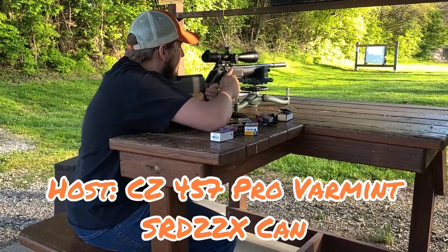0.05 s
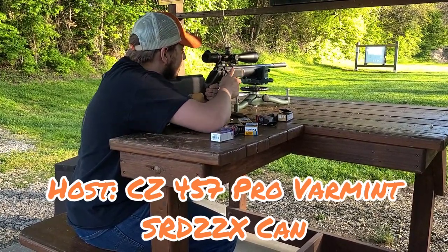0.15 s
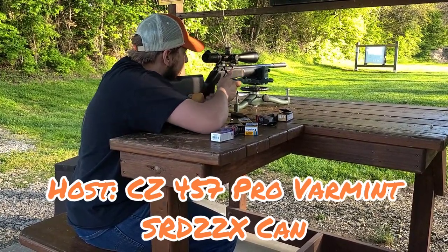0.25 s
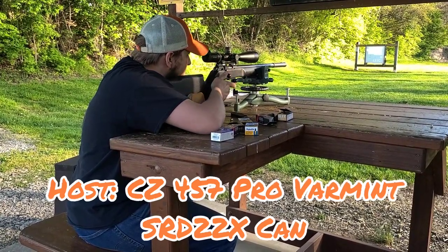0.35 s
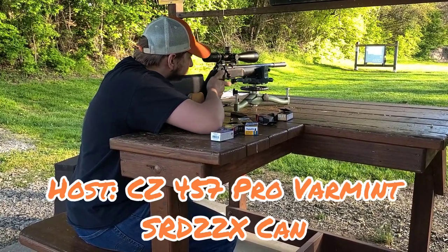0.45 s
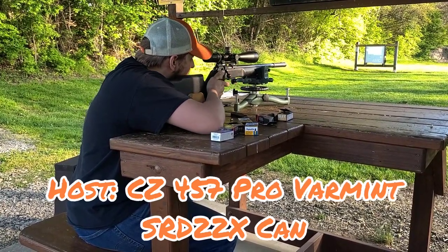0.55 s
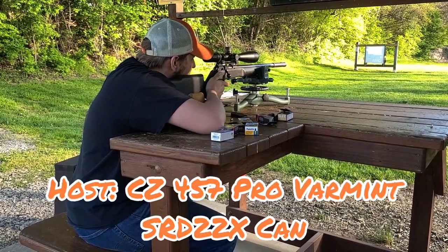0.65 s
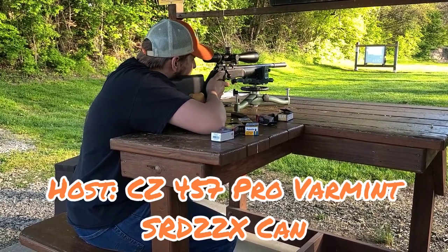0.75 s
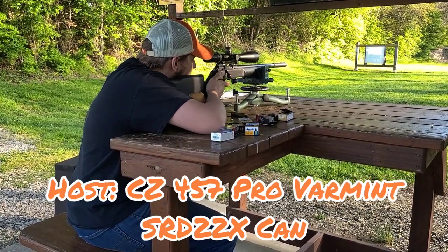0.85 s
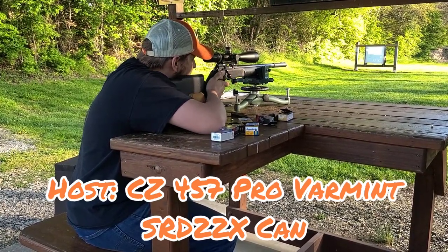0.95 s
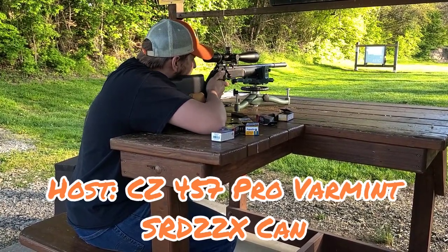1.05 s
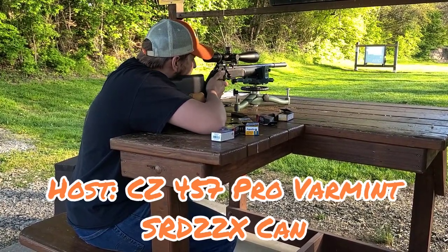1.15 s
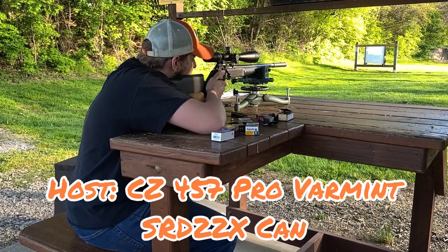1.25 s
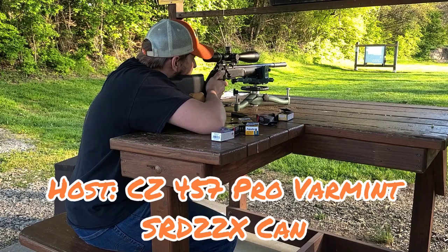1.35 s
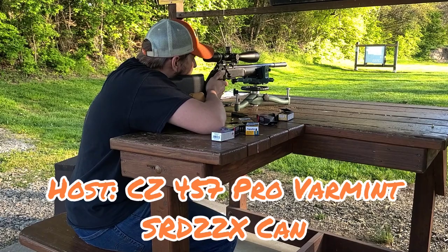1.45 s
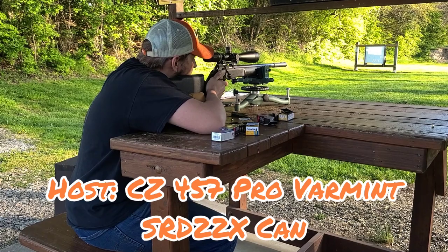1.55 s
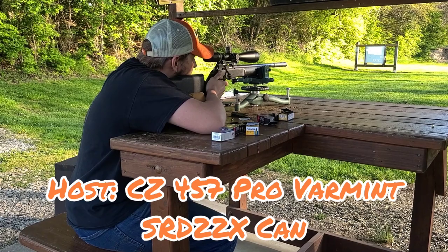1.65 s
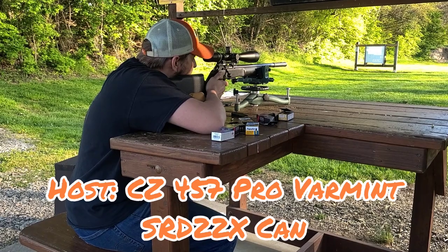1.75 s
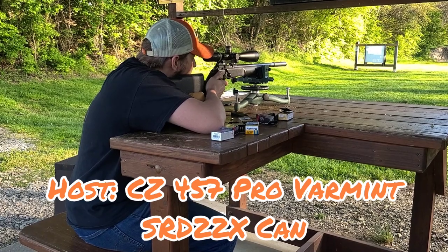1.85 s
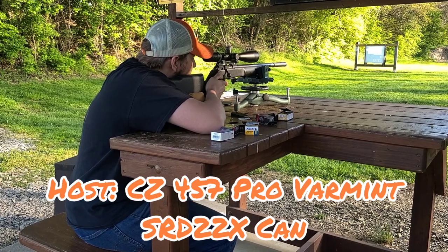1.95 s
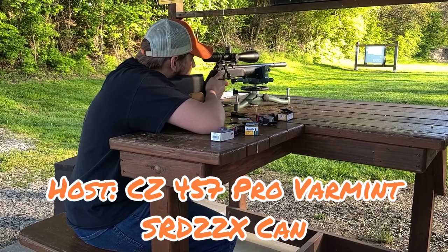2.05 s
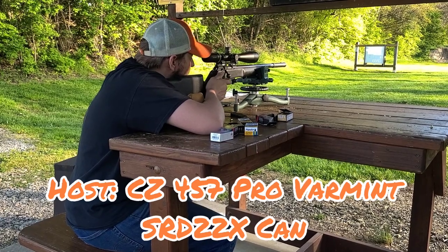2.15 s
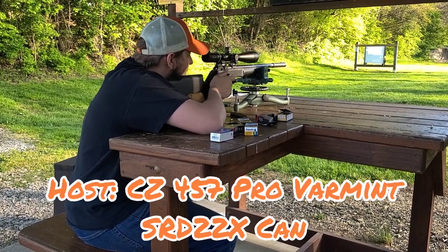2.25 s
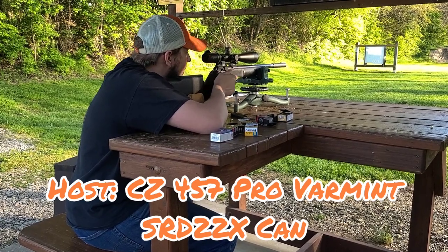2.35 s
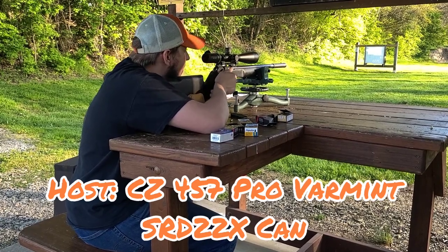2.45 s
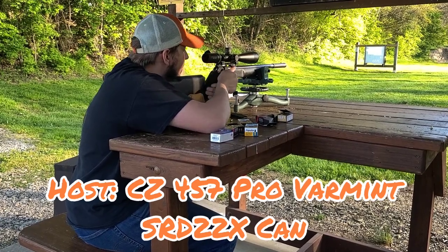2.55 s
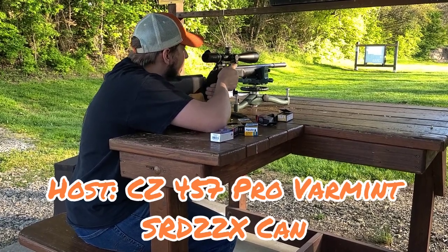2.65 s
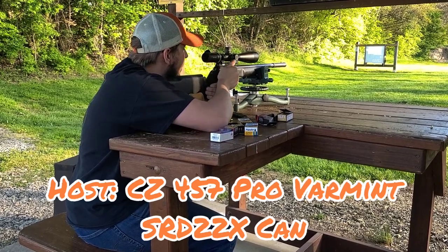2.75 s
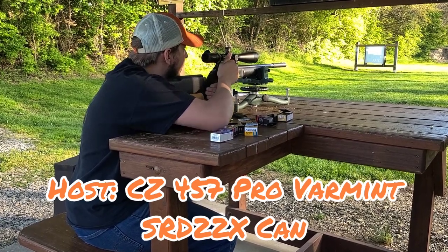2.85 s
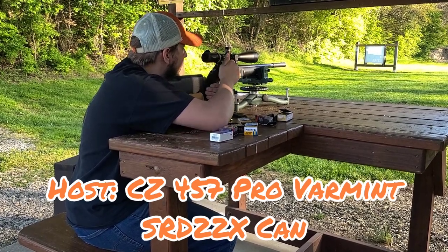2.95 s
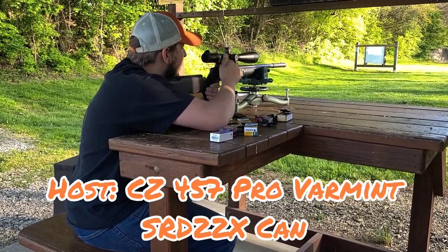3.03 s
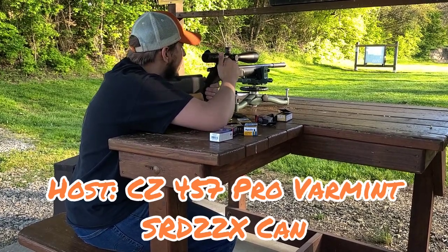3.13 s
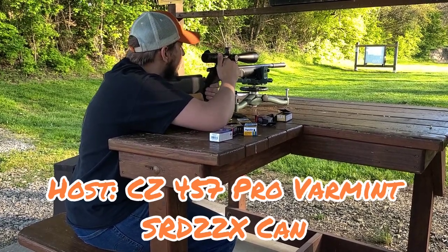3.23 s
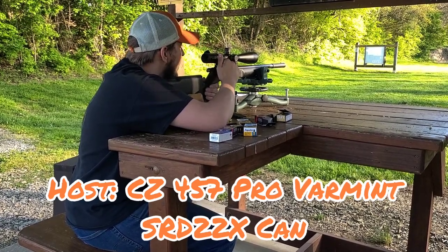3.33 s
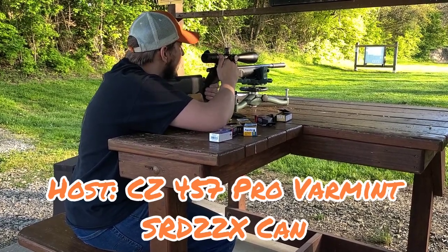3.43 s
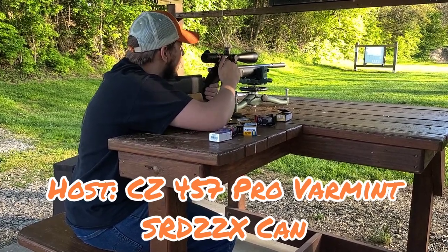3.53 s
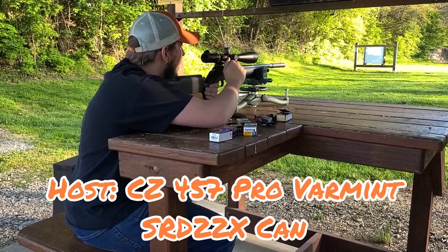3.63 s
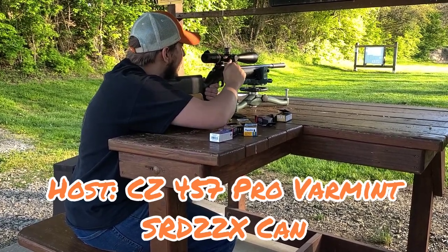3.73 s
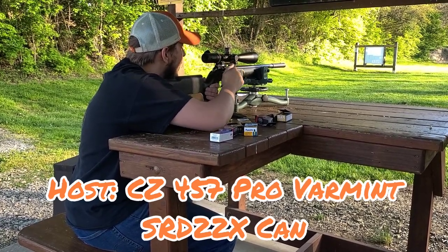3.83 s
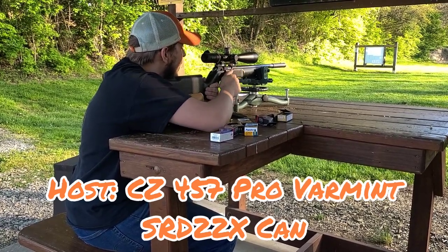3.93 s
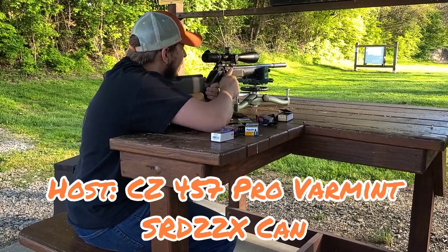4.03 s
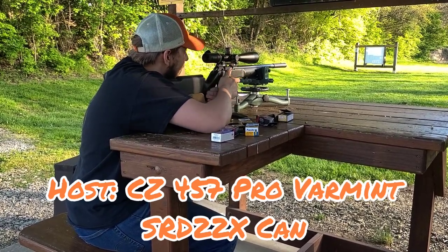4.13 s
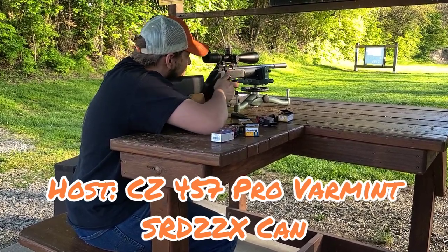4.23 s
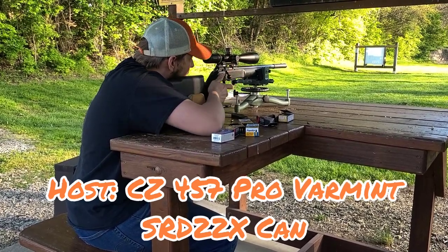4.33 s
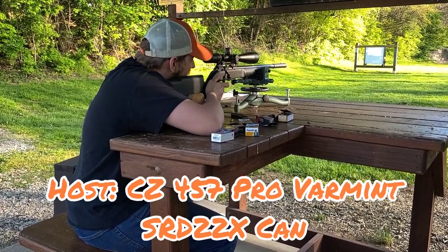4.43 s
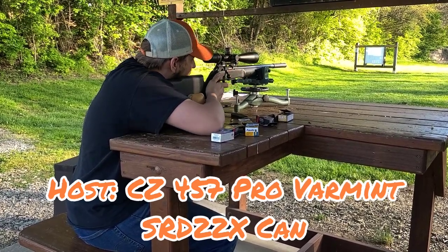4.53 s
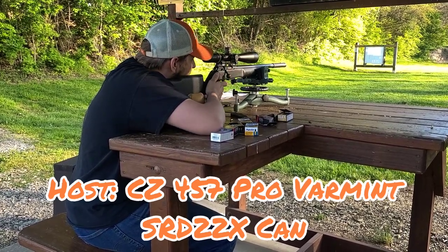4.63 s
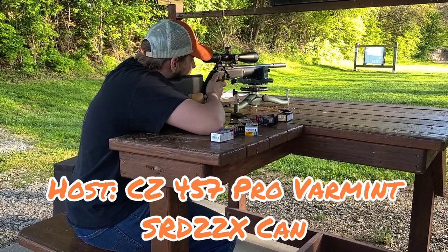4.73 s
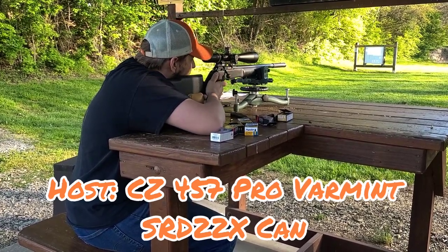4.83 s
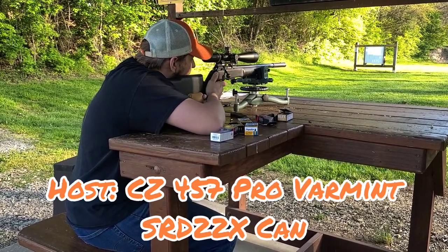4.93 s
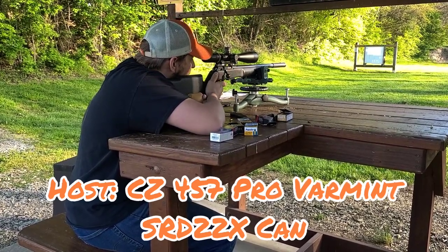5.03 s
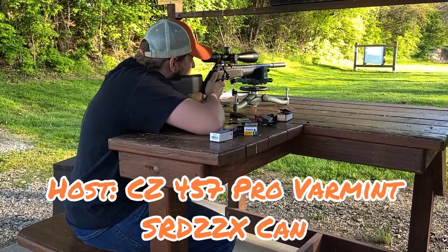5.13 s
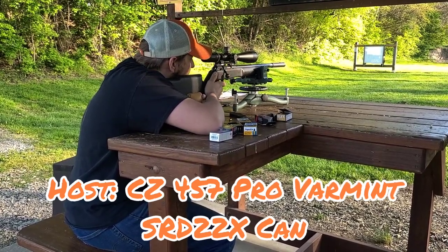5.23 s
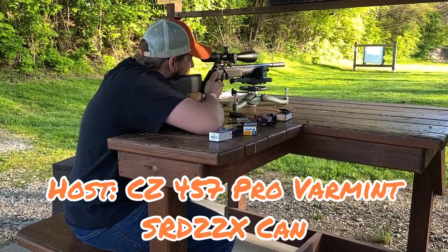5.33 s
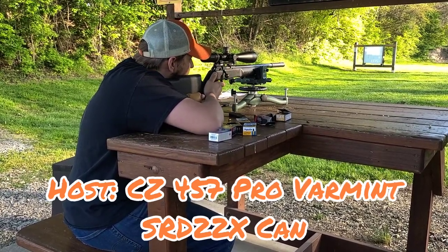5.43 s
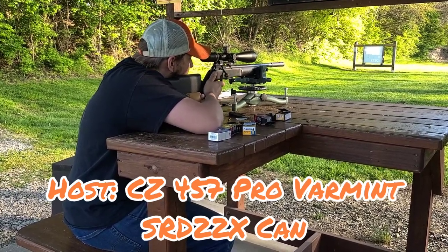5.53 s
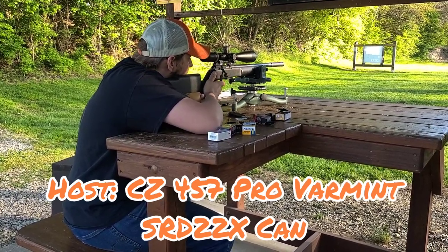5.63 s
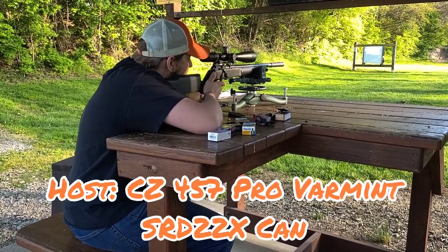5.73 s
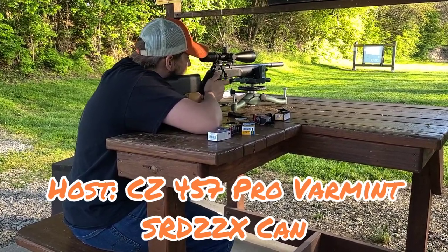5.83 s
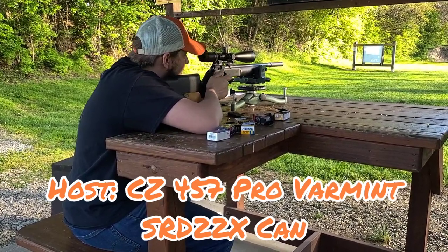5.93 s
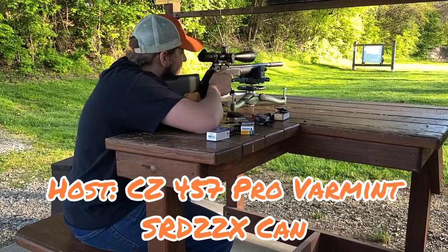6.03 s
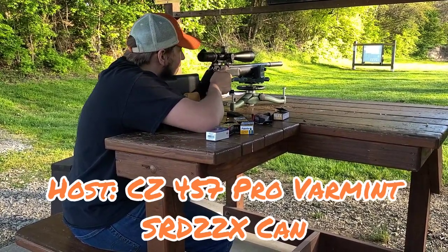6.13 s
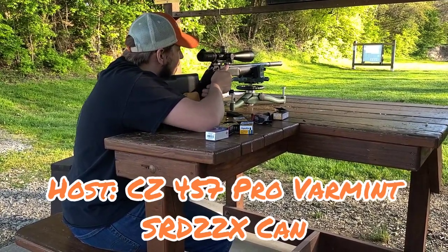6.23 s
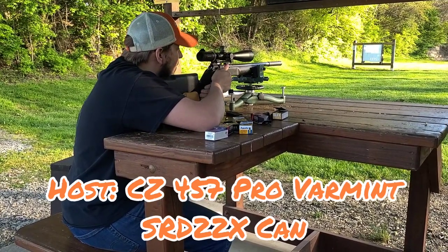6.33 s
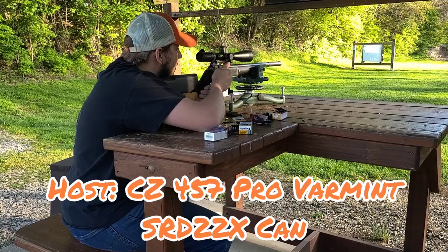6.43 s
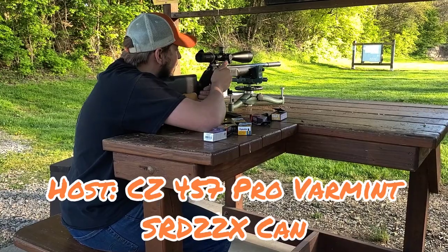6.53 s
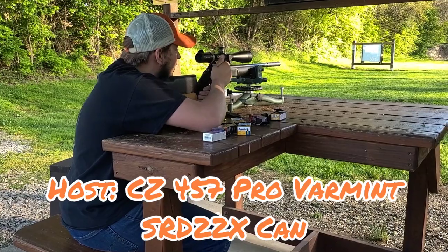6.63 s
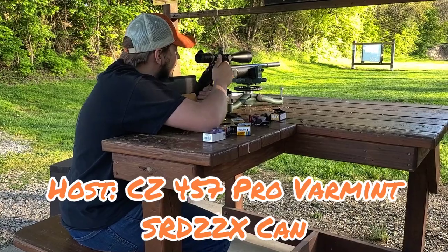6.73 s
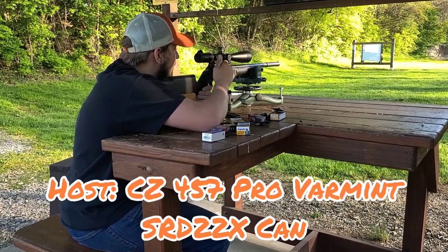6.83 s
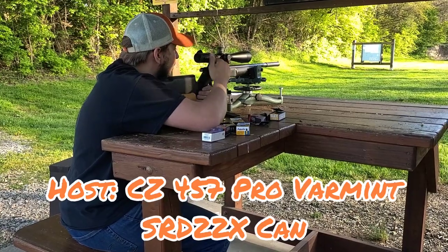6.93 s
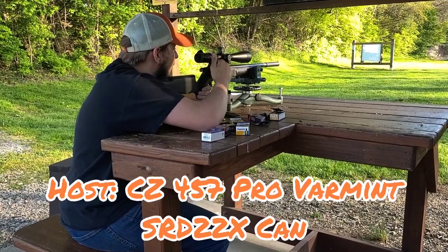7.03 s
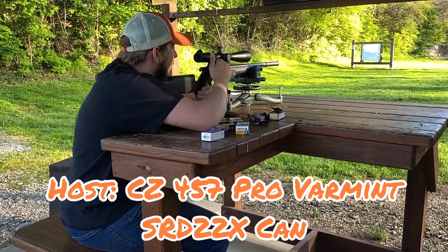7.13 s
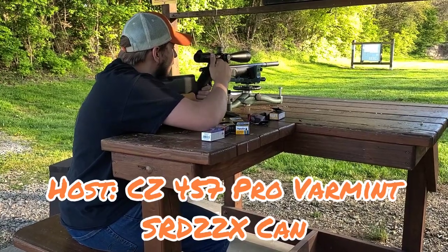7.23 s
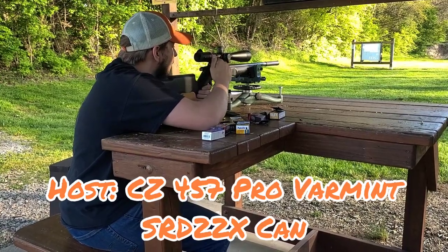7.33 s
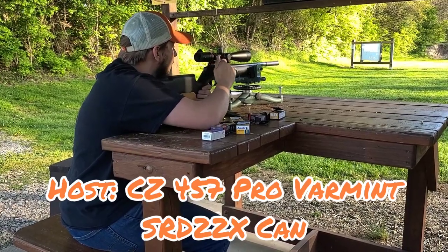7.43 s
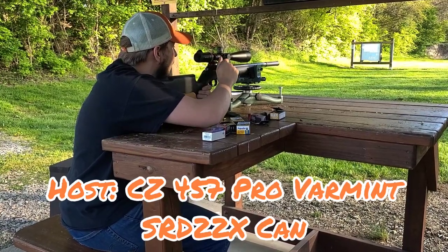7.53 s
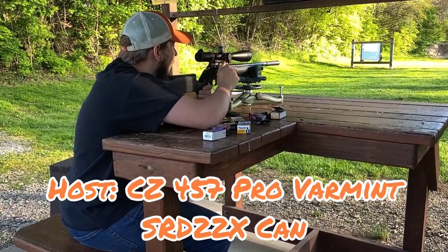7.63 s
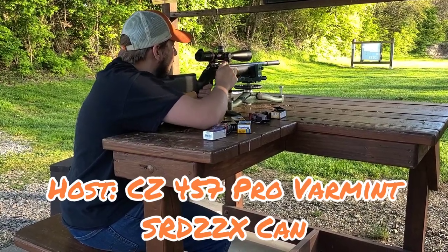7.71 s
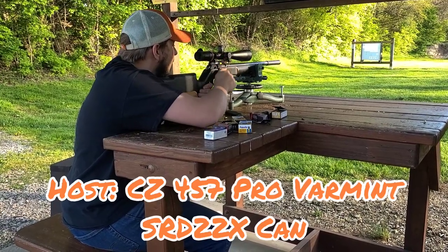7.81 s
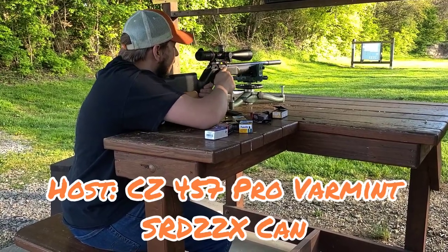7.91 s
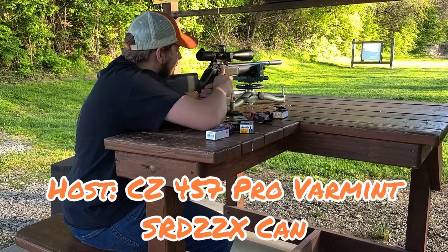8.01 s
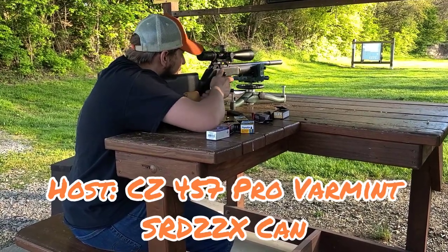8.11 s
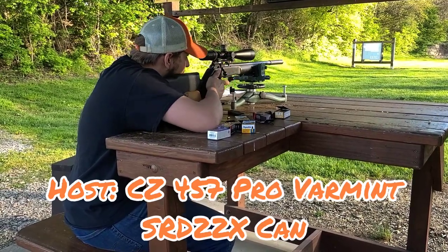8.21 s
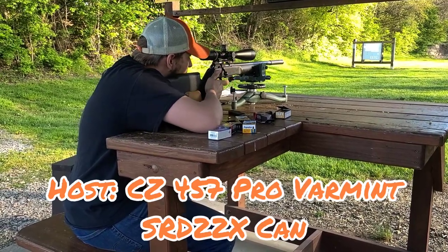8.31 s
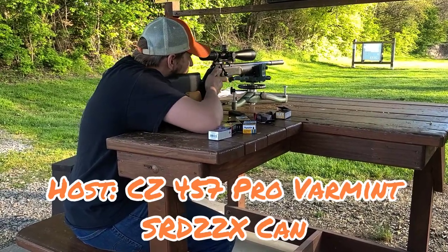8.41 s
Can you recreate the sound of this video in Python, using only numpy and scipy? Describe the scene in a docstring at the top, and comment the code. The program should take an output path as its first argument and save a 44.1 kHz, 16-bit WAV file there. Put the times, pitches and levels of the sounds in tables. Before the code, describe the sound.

Under an open roof outdoors, a small brass case tinkles on concrete over quiet traffic and leaf noise. A suppressed small-calibre rifle snaps close by; a third of a second later a target smacks and the trees echo. The bolt clacks up, slides back, then forward and locks, while a case knocks on wood and tings. A second shot and bolt cycle follow. Close stereo microphones.

```python
"""A bird chirps and a spent case bounces while an earlier knock dies away; then a suppressed small-calibre
bolt rifle fires from a wooden bench under a roof. The bullet smacks a far target and the woods answer; the
bolt is worked, a case bounces and rings, and a second shot, bolt stroke and bouncing case follow.
Blows excite ringing modes and broad clicks, and random reflections spread them over two microphones.
Behind: filtered-noise traffic, leaves and insects, a wavering hum, a twice-climbing engine, bird glides."""
import sys
import numpy as np
from scipy import signal
from scipy.fft import rfft, irfft
from scipy.io import wavfile
from scipy.ndimage import uniform_filter1d

SR = 44100
rng = np.random.default_rng(int(sys.argv[2]) if len(sys.argv) > 2 else 0)


def master(y):
    """Save y as 16-bit WAV."""
    cut = np.clip(np.atleast_2d(y).T, -1, 1)
    pcm = np.round(cut * 32767)  # scale
    wavfile.write(sys.argv[1], SR, pcm.astype(np.int16))


N = 373527
T = np.arange(N) / SR
RIGHT_LAG_S = .0005  # direct sound reaches the right microphone later


def undb(db):
    """Level in dB to amplitude factor."""
    return 10 ** (np.asarray(db) / 20)


def unit(x):
    """Scale to rms 1."""
    return x / np.sqrt(np.mean(x ** 2))


def band(x, hz, width):
    """Two-pole resonance, gain 1 at the centre."""
    return signal.lfilter(*signal.iirpeak(hz, hz / width, fs=SR), x)


def fade(t, t60):
    """Exponential decay, down 60 dB after t60 seconds."""
    return np.exp(-np.log(1000) * t / t60)


def walk(rate):
    """Slow random wander, spread 1, from `rate` smoothed random steps a second."""
    k = int(SR / rate)
    steps = np.repeat(rng.standard_normal(N // k + 1), k)
    return unit(uniform_filter1d(uniform_filter1d(steps, k), k)[:N])


def glide(a, b, hz, end_hz):
    """Sine sliding in a straight line from hz to end_hz between times a and b."""
    return np.sin(2 * np.pi * np.cumsum(np.interp(T, [a, b], [hz, end_hz])) / SR)


def ring(modes):
    """Response of a struck body: decaying sine modes, peak 1."""
    t = T[:SR // 2]
    y = sum(undb(db) * np.sin(2 * np.pi * hz * t) * fade(t, t60) for hz, db, t60 in modes)
    return y / np.abs(y).max()


def click(lo_hz, hi_hz):
    """Response of a dead part: a click in one broad band."""
    sos = signal.butter(2, [lo_hz, hi_hz], "band", fs=SR, output="sos")
    return signal.sosfilt(sos, signal.unit_impulse(SR // 100))


def blows(times, db, rattle_ms, response):
    """A millisecond of gathering contacts, the sharp blow, then a dying spray; db is the energy of the answer."""
    out = np.zeros(N + SR)
    ms_late = 1000 * T[:1000] - 1
    chance = rng.standard_normal((len(times), len(ms_late)))
    for s, gain, ms, contacts in zip(times, undb(db), np.broadcast_to(rattle_ms, len(times)), chance):
        dying = -ms_late / np.clip(ms, .1, 6)
        spray = 0.3 * contacts * np.exp(np.where(ms_late < 0, ms_late / 0.15, dying))
        spray[SR // 1000] = 1  # the sharp blow
        hit = signal.fftconvolve(spray, response)
        start = int(s * SR)
        out[start:start + len(hit)] += gain * hit / np.linalg.norm(hit)
    return out[:N]


def through(x, response):
    """Sound heard through a response, channel by channel."""
    return signal.oaconvolve(np.atleast_2d(x), np.atleast_2d(response), axes=1)[:, :N]


# shots: (t/s, crack level/dB, bullet flight and sound's return t/s, backstop thud level/dB)
ROUNDS = [(1.6642, 5, .3563, -37), (5.4033, 5.5, .3461, -13)]
# knocks of hand and bolt: (t/s, stroke whose layers it takes, crack level/dB); the rebound off the forward stop
# at 3.664 s takes the layers of a feed stroke, and the last light hand touch at 8.442 s those of a rebound
BOLT = [(2.626, "touch", -27), (2.8154, "lift", -8), (2.8191, "lift", 0), (3.098, "back", -1.5),
        (3.11, "rebound", -16), (3.581, "feed", -13), (3.615, "feed", -7.5), (3.647, "home", -1.5),
        (3.664, "feed", -16.5), (3.781, "nudge", -30), (3.909, "lock", -5), (6.428, "touch", -26.5),
        (6.635, "lift", -6.5), (6.642, "lift", -0.5), (6.97, "back", -1), (6.986, "rebound", -23),
        (7.449, "feed", -21), (7.468, "feed", -9), (7.499, "home", -2.5), (7.633, "nudge", -24.5),
        (7.838, "lock", -4.5), (8.442, "rebound", -31.5)]
# layers of each stroke, level/dB over its crack: (bench thump, stock knock, receiver clack, steel ring,
# body, top, then rattle time/ms, held within 0.1 to 6)
STROKES = {"touch": (-17.5, -24.5, -8.5, 3, -6, -10.5, 5.9),
           "lift": (-12.5, -20, -3.5, -10, -2, -2.5, -0.5), "back": (-9, -8, 1, -11.5, -1, -3, 2.6),
           "rebound": (-8, -13.5, -9, -7.5, -1, -3, 0), "feed": (-21, -24, -3.5, -2.5, -12, -3, -0.4),
           "home": (-21.5, -32, -3, -5, -12.5, -2, 2.1), "nudge": (1.5, -4, 3.5, -12, -11.5, -2, -1),
           "lock": (-9.5, -1.5, 9.5, -8.5, -4, -2, 0.5)}
# the shot in the same columns; gas does not ring the steel
MUZZLE = (-4, -11.5, -0.5, -62, -4, -0.5, 2)


def strokes():
    """Every bolt knock and shot as columns: time, crack level, its layers and rattle."""
    rows = [(s, db, *STROKES[kind]) for s, kind, db in BOLT]
    rows += [(s, db, *MUZZLE) for s, db, *_ in ROUNDS]
    return np.transpose(rows)


# modes of the ringing steel: (f/Hz, relative level/dB, t60/s)
STEEL = [(2498, -6.5, 0.036), (3328, -6.5, 0.11), (3559, -6.5, 0.041), (4220, 1, 0.012), (4634, -3.5, 0.02),
         (6460, -5.5, 0.011), (9610, -14, 0.13)]


def rifle_steel():
    """Sharp blows ring the steel and click in three broad bands: crack, body and top."""
    s, crack_db, _, _, _, steel_db, body_db, top_db, ms = strokes()
    out = blows(s, crack_db + steel_db, ms, ring(STEEL))
    out += blows(s, crack_db, ms, click(2700, 6200))
    out += blows(s, crack_db + body_db, ms, click(1200, 2800))
    out += blows(s, crack_db + top_db, ms, click(7000, 17000))
    return out


# modes of the receiver: (f/Hz, relative level/dB, t60/s)
RECEIVER = [(1053, 0, 0.019), (1239.6, 13.5, 0.018), (1440, -8.5, 0.0072)]


def receiver_clack():
    """The blows make the receiver ring in a few short modes."""
    s, crack_db, _, _, clack_db, *_ = strokes()
    return blows(s, crack_db + clack_db, 0.29, ring(RECEIVER))


# the bolt sliding up to its stop: (start t/s, end t/s, grit level/dB at the end, before filtering)
SLIDING = [(2.794, 2.825, -39), (3.056, 3.101, -23.5), (3.561, 3.634, -42), (6.619, 6.636, -29),
           (6.932, 6.961, -25), (7.421, 7.495, -40)]
SLIDE_RISE_DB, SLIDE_TOP_DB = 13, -9.5  # growth over a slide; top band over the main band


def bolt_slide():
    """Uneven friction grit grows louder up to the stop, coloured by broad resonances."""
    grit = unit(rng.standard_normal(N) * undb(2.6 * rng.standard_normal(N)))
    level = np.zeros(N)
    for a, b, db in SLIDING:
        growing = undb(np.interp(T, [a, b], [db - SLIDE_RISE_DB, db]))
        level += growing * np.clip((T - a) / 0.0057, 0, 1) * (T < b)
    scrape = level * grit
    main = band(band(scrape, 2200, 4700), 3000, 9000)
    return main + undb(SLIDE_TOP_DB) * band(scrape, 14000, 9000)


# modes of the wooden bench: (f/Hz, relative level/dB, t60/s)
BENCH = [(114, -10.5, 0.044), (159, -10.5, 0.1), (239, -3.5, 0.19), (292, 3, 0.058), (387, -7.5, 0.016),
         (468, -4, 0.032), (637, -3.5, 0.045), (740, -8, 0.014)]
# the rifle shifting on its rest: (t/s, level/dB before reflections and panning)
BUMPS = [(3.171, -12), (3.183, -16.5), (3.228, -15.5), (7.04, -14), (7.066, -15)]


def bench_thumps():
    """Blows ring the bench modes; stock knocks and rest bumps are dull broad clicks."""
    s, crack_db, thump_db, stock_db, *_ = strokes()
    wood = blows(s, crack_db + thump_db, .15, ring(BENCH))
    wood += blows(s, crack_db + stock_db, 4.3, click(300, 700))
    return wood + blows(*np.transpose(BUMPS), 4.3, click(210, 505))


# bounces of spent cases: (t/s, surface, then level/dB of tick, top, brass ring)
BOUNCES = [(0.363, "concrete", -27, -23.5, -28), (0.5465, "concrete", -25, -28.5, -32),
           (0.677, "concrete", -31, -32, -36), (0.772, "concrete", -28.5, -53, -31.5),
           (0.818, "concrete", -38, -42, -36), (0.86, "concrete", -33.5, -55, -57),
           (0.899, "concrete", -60, -53, -50), (0.939, "concrete", -58, -56, -48),
           (0.974, "concrete", -58, -58, -46), (3.274, "wood", -10.5, -26, -29),
           (3.487, "wood", -15, -36, -25), (3.7439, "wood", -15, -34, -53),
           (3.8749, "wood", -15.5, -22.5, -34), (3.983, "concrete", -25, -55, -47),
           (4.029, "wood", -28.5, -56, -57), (4.074, "wood", -45, -61, -57),
           (4.099, "wood", -36.5, -60, -57), (7.332, "wood", -10.5, -35, -53),
           (8.25, "concrete", -19, -19, -32)]
# dull knock of each surface: level/dB over the tick
KNOCK_DB = {"wood": -1.5, "concrete": -22.5}
# modes of the brass tube: (f/Hz, relative level/dB, t60/s)
BRASS = [(4960, -17.5, 0.025), (5000, -7.5, 0.0572), (4900, -4, 0.036), (12300, -10, 0.1),
         (12300, 12.5, 0.12)]


def cases():
    """A tick on wood or concrete, and the thin brass tube ringing on."""
    rows = [(s, KNOCK_DB[surface], *db) for s, surface, *db in BOUNCES]
    s, knock_db, tick_db, top_db, ring_db = np.transpose(rows)
    tick = blows(s, tick_db, 0.31, click(4370, 6130))
    knock = blows(s, tick_db + knock_db, 0.39, click(920, 2600))
    top = blows(s, top_db, .35, click(9400, 16000))
    return tick + knock + top + blows(s, ring_db, 0.12, ring(BRASS))


# reflections under the open roof, lingering longest in the lowest band:
# (f/Hz, t60/s, energy level/dB over the direct sound before each source's own offset)
ROOF = [(364, 0.36, 3), (800, 0.12, -1.5), (1600, 0.17, -3), (3330, 0.19, 5.5), (6000, 0.17, -4.5),
        (12100, 0.11, 8)]
ROOF_RISE_S = .005


def shelter(lag_s, echo_db):
    """Direct sound, then roof, bench and floor reflections; their bass is alike at both microphones."""
    t = T[:SR // 4]
    out = np.zeros((2, len(t)))
    direct = signal.unit_impulse(len(t))
    sparse = rng.standard_normal((3, len(t))) * undb(1.4 * rng.standard_normal((3, len(t))))
    for hz, t60, db in ROOF:
        like = 1 / (1 + (hz / 750) ** 4)  # energy share common to both sides
        mix = np.sqrt(like) * sparse[2] + np.sqrt(1 - like) * sparse[:2]
        echo = band(band(mix, hz, 1.73 * hz), hz, 1.73 * hz)
        echo = echo * fade(t, t60) * (1 - np.exp(-(t / ROOF_RISE_S) ** 2))
        direct_energy = np.linalg.norm(band(direct, hz, hz))
        out += undb(db + echo_db) * direct_energy * echo / np.linalg.norm(echo, axis=1, keepdims=True)
    out[0, 0] += 1
    out[1, int(lag_s * SR)] += 1
    return out


def sliced_shelter(x):
    """Rifle sound in crossfaded quarter-second slices, each with freshly drawn roof reflections."""
    hop = int(.25 * SR)
    out = np.zeros((2, N + SR))
    window = signal.windows.hann(2 * hop, sym=False)
    for i in range(0, N, hop):
        room = shelter(RIGHT_LAG_S, 0)
        part = x[i:i + 2 * hop] * window[:N - i]
        wet = signal.fftconvolve(part[None], room, axes=1)
        out[:, i:i + wet.shape[1]] += wet
    return out[:, :N]


# main echo off the far trunks: (centre f/Hz, width f/Hz, t60/s, rise t/s)
WOODS = (1100, 2200, 0.95, 0.0068)
# quick bright returns from near leaves: the same columns, then level/dB over the trunks
LEAVES = (6200, 17000, 0.29, 0.006, 4.2)


def woods():
    """Scattered returns from trunks and leaves, unrelated left and right."""
    t = T[:SR]
    out = np.zeros((2, SR))
    for hz, width, t60, rise, db in [(*WOODS, 0), LEAVES]:
        scatter = unit(band(band(rng.standard_normal((2, SR)), hz, width), hz, width))
        out += undb(db) * scatter * fade(t, t60) * (1 - np.exp(-t / rise))
    return out


# bullet strike and its ground bounce: (t/s after the strike arrives, right smack level/dB, thud level/dB)
TARGET = [(0.0, -8, -23), (0.012, -19, -46)]
BACKSTOP_S, BACKSTOP_DB = .0467, -27.5  # backstop: time after the strike, smack on the right
BLAST_ECHO_S, BLAST_ECHO_DB = .273, -30  # muzzle blast back from the target, after the shot
LATE_ECHO_S, LATE_ECHO_DB = .21, -34  # strike off the tree line, after the strike


def downrange():
    """Dry smacks from the target, stronger on the left; they and the muzzle blast echo among the trees."""
    rows, echoes = [], []
    for shot, _, flight, backstop_db in ROUNDS:
        strike = shot + flight
        rows += [(strike + late, smack_db, thud_db) for late, smack_db, thud_db in TARGET]
        rows.append((strike + BACKSTOP_S, BACKSTOP_DB, backstop_db))
        echoes += [(shot + BLAST_ECHO_S, BLAST_ECHO_DB), (strike + LATE_ECHO_S, LATE_ECHO_DB)]
    s, smack_db, thud_db = np.transpose(rows)
    smack = blows(s, smack_db, 1.0, click(1600, 6000))
    smack += blows(*np.transpose(echoes), 2.5, click(2700, 4300))
    thud = blows(s, thud_db, 0.42, click(180, 400))
    muzzle = blows(*np.transpose(ROUNDS)[:2], 0.05, click(1100, 7000))
    direct = np.array([undb(6.0) * smack, np.roll(smack, int(RIGHT_LAG_S * SR))]) + thud
    return direct + through(undb(-40.5) * smack + undb(-51.5) * muzzle, woods())


# fading echo under the roof: (rms level/dB before the fade, t60/s)
EARLIER = (-56.5, 0.22)


def earlier():
    """Fading band noise: the dying echo of a knock just before the start."""
    db, t60 = EARLIER
    return undb(db) * fade(T, t60) * unit(band(rng.standard_normal((2, N)), 770, 1700))


# far engine climbing: (start t/s, end t/s, start f/Hz, end f/Hz, mean level/dB, loudest swell t/s)
ENGINE = [(3.226, 4.35, 61, 73.3, -46.5, 3.64), (6.703, 8.208, 62.83, 80.56, -44.5, 7.1)]
ENGINE_SWELL_S, ENGINE_SWELL_DB = 0.42, 4.5  # wavering level: period, swing either way


def engine():
    """A far engine: a low sine climbs in pitch twice as its level wavers."""
    out = np.zeros(N)
    for a, b, hz, end_hz, db, loud in ENGINE:
        gate = np.clip(np.minimum(T - a, b - T) / 0.15, 0, 1)
        swell = ENGINE_SWELL_DB * np.cos(2 * np.pi * (T - loud) / ENGINE_SWELL_S)
        out += gate * undb(db + swell) * glide(a, b, hz, end_hz)
    return out


# bird notes: (start t/s, end t/s, start f/Hz, end f/Hz, peak level/dB)
BIRD = [(.115, .16, 3900, 3730, -73), (1.15, 1.19, 2950, 2700, -76), (1.195, 1.24, 2730, 2720, -75),
        (0.504, 0.55, 3250, 3040, -67), (.56, .605, 2900, 2850, -70), (8, 8.092, 2667, 2540, -66),
        (8.058, 8.12, 3430, 3470, -69)]


def birds():
    """Short gliding whistles, each swelling and fading as half a sine."""
    out = np.zeros(N)
    for a, b, hz, end_hz, db in BIRD:
        swell = np.sin(np.pi * np.clip((T - a) / (b - a), 0, 1))
        out += undb(db) * swell * glide(a, b, hz, end_hz)
    return out


# chorus: (centre f/Hz, width f/Hz, mean level/dB, left over right level/dB)
INSECTS = (6298.5, 486, -81, 7.5)


def insects():
    """A narrow throbbing chorus of band noise, stronger on the left."""
    hz, width, db, pan_db = INSECTS
    hiss = unit(band(band(rng.standard_normal((2, N)), hz, width), hz, width))
    return hiss * undb(db + 2.5 * walk(9.1) + np.array([[pan_db], [-pan_db]]) / 2)


# hum lines: (mean f/Hz, mean level/dB)
HUM = [(53.8, -61), (118.4, -57)]


def hum():
    """Low sine lines whose pitch and level wander slowly."""
    out = np.zeros(N)
    for hz, db in HUM:
        phase = 2 * np.pi * np.cumsum(hz * (1 + 0.018 * walk(1.6))) / SR
        out += undb(db + 1.2 * walk(2)) * np.sin(phase)
    return out


# spectrum of the air: (f/Hz, relative level/dB per Hz)
AIR = [(13, -47), (22, -17), (36, -12.5), (52, 2.5), (83, -6), (118, -6), (184, -20.5), (217, -24),
       (356, -25.5), (398, -26.5), (469, -28.5), (2670, -43), (4630, -51), (6270, -55), (7600, -80),
       (16000, -75)]
AIR_DB = -48  # overall rms, before the slow swell


def air():
    """Far traffic and leaves: coloured noise, alike in the bass, swelling slowly."""
    f = np.maximum(np.fft.rfftfreq(N, 1 / SR), 1)
    hz, db = np.transpose(AIR)
    shape = undb(np.interp(np.log(f), np.log(hz), db))
    like = 1.13 / (1 + (f / 600) ** 2) / (1 + (45 / f) ** 2)  # light wind parts the deepest bass
    mid, side = rfft(rng.standard_normal((2, N)))
    pair = np.sqrt(1 + like) * mid + np.sqrt(1 - like) * side * np.array([[1], [-1]])
    return unit(irfft(shape * pair, N)) * undb(AIR_DB + 0.9 * walk(3.5))


def scene():
    """Rifle, bench and cases under the roof, the far target, then the background."""
    near = sliced_shelter(rifle_steel() + bolt_slide())
    # the receiver is nearer the middle line of the microphones, so it lags less
    near += through(receiver_clack(), shelter(.00022, -6))
    bench_pan = undb([[-1.5], [1.5]])  # 3 dB stronger on the right
    near += through(bench_thumps(), shelter(0, -4)) * bench_pan
    near += through(cases(), shelter(RIGHT_LAG_S, -6.5))
    return near + downrange() + earlier() + engine() + birds() + insects() + hum() + air()


HISS_DB = -82.5
SHELF_HZ, TOP_HZ = 15800, 16800  # start of the steep drop; edge of the final cut


def record(dry):
    """The recorder hisses faintly, rounds the loudest peaks, drops steeply at the top and cuts all beyond."""
    hissing = dry + undb(HISS_DB) * rng.standard_normal(dry.shape)
    rounded = .92 * np.tanh(hissing / .92)
    shelf = signal.sosfilt(signal.ellip(6, .2, 22, SHELF_HZ, fs=SR, output="sos"), rounded)
    return signal.sosfilt(signal.ellip(10, .2, 95, TOP_HZ, fs=SR, output="sos"), shelf)


dry = scene()
out = record(dry)
master(out)
```